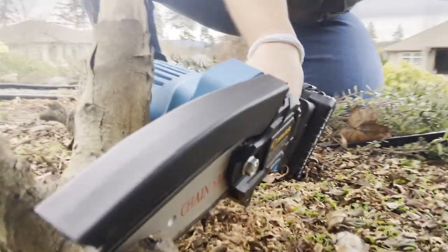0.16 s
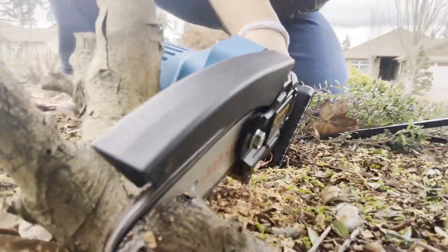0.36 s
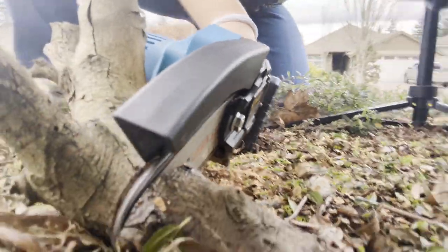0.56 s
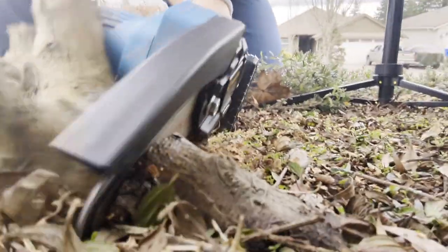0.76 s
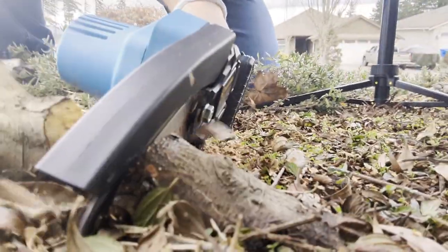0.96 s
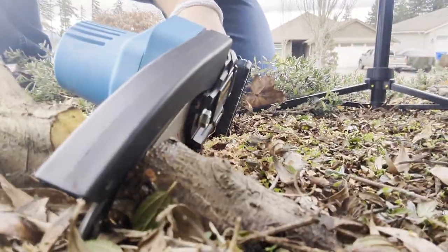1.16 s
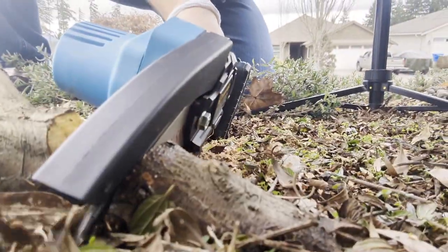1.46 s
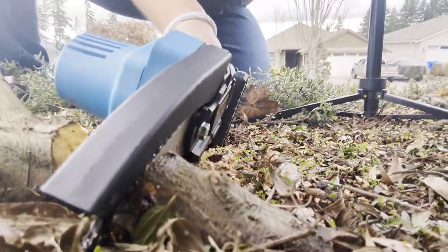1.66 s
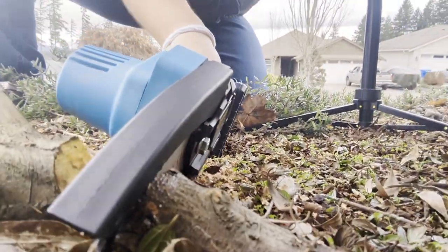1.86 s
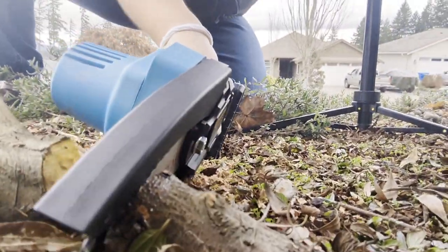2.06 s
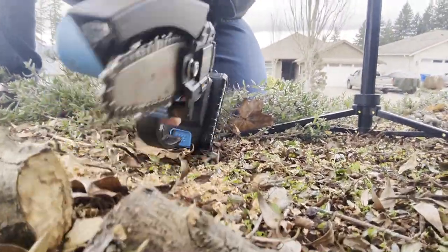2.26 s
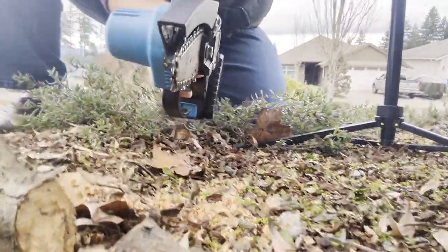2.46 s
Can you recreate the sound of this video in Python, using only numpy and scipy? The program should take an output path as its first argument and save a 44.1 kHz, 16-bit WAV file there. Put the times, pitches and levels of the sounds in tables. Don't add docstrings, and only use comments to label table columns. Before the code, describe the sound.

Close stereo sound of an electric chainsaw cutting wood outdoors: steady buzzing whine with hissing fan, a short juddering snag, free running, quick stop with a click, then sparse leaf rustles and twig snaps.

```python
import sys
import numpy as np
from scipy import signal
from scipy.fft import rfft, irfft, next_fast_len
from scipy.io import wavfile
from scipy.ndimage import map_coordinates

SR = 44100
rng = np.random.default_rng(int(sys.argv[2]) if len(sys.argv) > 2 else 0)


def wav_record(signal):
    frames = np.transpose(np.atleast_2d(signal))
    bounded = np.clip(frames, -1, 1)
    quanta = np.round(bounded * 32767).astype(np.int16)
    wavfile.write(sys.argv[1], SR, quanta)


def to_linear_factor(level_db):
    exponent = np.asarray(level_db, float) / 20
    return 10 ** exponent


N = 114660
PORT_LAG_S = 0.00011


def unit(x):
    return x / np.sqrt(np.mean(x ** 2) + 1e-20)


def along(points, hz):
    f, v = np.transpose(points)
    return np.interp(np.log(hz + 1), np.log(f + 1), v)


def curves(rows):
    s, *cols = np.transpose(rows)
    return [np.interp(np.arange(N) / SR, s, c) for c in cols]


def wobble(rate_hz):
    knots = rng.standard_normal(int(N * rate_hz / SR) + 4)
    return map_coordinates(knots, [np.arange(N) * rate_hz / SR])


def filtered(x, response):
    m = next_fast_len(N + SR // 2)
    return irfft(rfft(x, m) * response(np.fft.rfftfreq(m, 1 / SR)), m)[..., :N]


def mode(hz, centre_hz, width_hz):
    damping = 1j * hz * width_hz
    return damping / (centre_hz * centre_hz - hz * hz + damping)


def clatter(rate_hz, size_db, life_s, share):
    struck = rng.random(N) < rate_hz / SR
    hits = struck * to_linear_factor(size_db * np.clip(rng.standard_normal(N), -2, 2))
    gate = unit(signal.lfilter([1], [1, -np.exp(-1 / (life_s * SR))], hits))
    share = np.clip(share, 0, 1)
    return rng.standard_normal((2, N)) * np.sqrt(1 - share + share * gate ** 2)


# (frequency [Hz], correlation [-1 to 1])
PORT_LIKENESS = [(100, 0.93), (500, 0.65), (1200, 0.58), (2500, 0.12), (6000, 0.15)]


def ports(pair, left, right):
    def mix(hz):
        turn = np.arccos(np.clip(along(PORT_LIKENESS, hz), -1, 1)) / 2
        return np.array([np.cos(turn), np.sin(turn)])

    def colour(hz):
        lag = np.exp(-2j * np.pi * hz * PORT_LAG_S)
        return to_linear_factor([along(left, hz), along(right, hz)]) * [lag, 1 + 0 * hz]

    mid, side = filtered(pair, mix)
    return unit(filtered(np.array([mid + side, mid - side]), colour))


# (time [s], chain effort [dB], casing shake [dB], cutting load [0-1])
MOTOR = [(0, -34.5, -3.5, 0.6), (.2, -34.5, 0, 0.56), (.35, -33, 2, 0.68), (.64, -32.5, 0, 0.9),
         (.7, -32.5, -7, 0.8), (.835, -33.5, 7.5, 0.8), (.855, -36, 5.5, 0.2), (.92, -35, 7, 0.02),
         (1.05, -34, 2, 0), (1.3, -35, 0, 0.61), (1.52, -34, 0.5, 0.33), (1.57, -37.5, -4, 0),
         (1.62, -45, -12.5, 0.44), (1.655, -49, -29, 0), (1.672, -78, -40, 0.04), (1.69, -84.5, -60, 0.1)]
# (time [s], speed [Hz])
SHAFT_SPEED = [(0, 309), (.15, 312), (.66, 311.5), (.72, 290), (.84, 250), (.852, 256), (.87, 288),
               (.918, 314.5), (.98, 321.5), (1.522, 322), (1.562, 230), (1.596, 160), (1.62, 135),
               (1.69, 20)]


def saw():
    shaft_hz, = curves(SHAFT_SPEED)
    effort_db, shake_db, load = curves(MOTOR)
    turns = np.cumsum(shaft_hz) / SR
    tones = shaft_tones(shaft_hz, turns, shake_db, load)
    beat = chain_beat(turns, effort_db)
    noise = chain(shaft_hz) * to_linear_factor(0.92) + fan(shaft_hz) * to_linear_factor(6.0)
    return nearby(poses(beat * noise)) + tones * to_linear_factor([[-.7], [.7]])


SHAFT_ORDERS = [1, 1.8, 2, 2.55, 3, 4, 5]
# (running free [dB], under load [dB])
ORDER_LEVELS = [(-54, -62), (-56.5, -59.5), (-46.5, -48.5), (-66, -54.5), (-60, -41), (-65.5, -59),
                (-57.5, -56.5)]


def shaft_tones(shaft_hz, turns, shake_db, load):
    tones = 0
    for order, (free_db, cut_db) in zip(SHAFT_ORDERS, ORDER_LEVELS):
        level_db = free_db + (cut_db - free_db) * load + shake_db
        level_db = level_db + (.7 + order * load) * wobble(70)
        radiation = np.minimum(order * shaft_hz / 225, np.sqrt(2)) ** 3 / 2
        jitter = (.15 + .08 * order * order * load) * wobble(60)
        tones = tones + to_linear_factor(level_db) * radiation * np.sin(2 * np.pi * order * turns + jitter)
    return tones


GEAR_RATIO, LOOP_TURNS, HITS_PER_TURN = 5, 28, 9


def chain_beat(turns, effort_db):
    links = np.tile(rng.standard_normal(7), 40)
    loop_db = -0.36 * map_coordinates(links, [turns / LOOP_TURNS * 7])
    shaft = 1 + 0.16 * np.cos(2 * np.pi * turns)
    sprocket = 1 + 0.073 * np.cos(2 * np.pi * turns / GEAR_RATIO)
    return shaft * sprocket * to_linear_factor(effort_db + loop_db + .4 * wobble(12))


# (frequency [Hz], density [dB per Hz])
CHAIN_LEFT = [(200, -18.5), (450, -3), (850, -1.5), (1100, 1.5), (2200, -1), (4500, -2.5), (6200, -9.5),
              (8300, -0.5)]
CHAIN_RIGHT = [(200, -25.5), (450, -4.5), (850, -3.5), (1700, 3), (2400, 1.5), (5000, 2), (6450, 1),
               (7300, 2.5)]


def chain(shaft_hz):
    rattle = clatter(2 * shaft_hz * HITS_PER_TURN / GEAR_RATIO, 10, 0.00071, 0.21)
    top = [(9170, -25)]  # Hz, dB per Hz
    return ports(rattle, CHAIN_LEFT + top, CHAIN_RIGHT + top)


# (frequency [Hz], density [dB per Hz])
FAN_LEFT = [(7000, -32), (8300, -9.5), (10000, 1), (12000, -0.5), (14500, -5), (15900, -16)]
FAN_RIGHT = [(7000, -7), (8400, 4), (10000, 1.5), (11800, 10), (14000, 11.5), (15900, 6.5)]


def fan(shaft_hz):
    hiss = ports(clatter(shaft_hz * 2.0, 9.5, 0.0013, 0.14), FAN_LEFT, FAN_RIGHT)
    fade_db_per_s = -5
    return hiss * to_linear_factor(4 + fade_db_per_s * np.minimum(np.arange(N) / SR, .8))


# (frequency [Hz], width [Hz], boost [dB])
POSE_MODES = [
    [(1690, 340, -2), (3640, 270, -1.5), (6500, 450, -9), (8620, 570, -1.5)],
    [(1550, 250, -2.5), (3384, 400, -0.5), (4110, 250, -7.5), (6530, 170, 2), (8270, 370, -16.5)],
    [(1695, 88, 0), (1976, 130, -1.5), (2620, 280, -7), (5430, 110, -10.5), (6355, 200, 2), (8180, 600, -7)],
]
# (time [s], pose [0-2])
POSE = [
    (0, 0),
    (.22, 0.1),
    (.34, 1),
    (.7, 1),
    (.86, 2),
    (2.6, 2),
]


def poses(x):
    pose, = curves(POSE)
    out = 0
    for k, modes in enumerate(POSE_MODES):
        def ring(hz):
            return 1 + sum(to_linear_factor(db) * mode(hz, centre, width) for centre, width, db in modes)
        out = out + filtered(x, ring) * np.maximum(1 - abs(pose - k), 0)
    return out


# (frequency [Hz], width [Hz], depth [0-1])
GUARD_SHADOWS = [(4054, 54, 0.6), (7300, 310, 0.54), (10070, 590, 0.4)]


def nearby(x):
    when = rng.random((2, 2, 6, 1))
    size = rng.standard_normal((2, 2, 6, 1))
    spread_s, strength_db = .004, -14

    def path(hz):
        copies = size * np.exp(-2j * np.pi * hz * when * spread_s)
        echoes = 1 + to_linear_factor(strength_db) * np.sum(copies, axis=2) / 2
        shadow = 1
        for centre, width, depth in GUARD_SHADOWS:
            shadow = shadow * (1 - np.clip(depth, 0, .95) / (1 + (2 * (hz - centre) / width) ** 2))
        small_source = hz ** 2 / (hz ** 2 + 127.0 ** 2)
        return echoes * shadow * small_source

    here, there = filtered(x, path)
    rock = .5 + .5 * np.tanh(2 * wobble(4))
    return here * rock + there * (1 - rock)


# (frequency [Hz], width [Hz], level [dB])
LOG_MODES = [(134, 37, -2), (235.4, 74, 0), (323, 77, 2), (462, 81, 1.5), (660, 200, -6.5), (987, 125, 1.5),
             (1430, 1100, -23.5)]


def wood(hz):
    return sum((-1) ** k * to_linear_factor(db) * mode(hz, centre, width)
               for k, (centre, width, db) in enumerate(LOG_MODES))


def log():
    body = filtered(blows(), wood) + shudder() + thumps()
    return np.array([to_linear_factor(-3.5) * np.roll(body, round(PORT_LAG_S * SR)), to_linear_factor(2.0) * body])


# (time [s], peak [dB])
SNAGS = [(0.686, -18), (0.698, -20), (0.72, -20), (0.731, -19), (0.739, -26), (.755, -28.5), (0.762, -20.5),
         (0.779, -16), (0.784, -14), (0.7943, -12), (0.799, -13), (0.809, -21), (0.815, -19), (0.83, -15),
         (0.835, -28.5), (0.838, -14.5)]
# (time [s], peak [dB])
NUDGES = [
    (0.438, -36),
    (0.448, -38),
    (2.234, -40.5),
]


def blows():
    force = np.zeros(N)
    for s, db in SNAGS + NUDGES:
        rough = 1 + .6 * rng.standard_normal(40)
        force[round(s * SR):][:40] = to_linear_factor(db + 4) * rough * np.hanning(40) * rng.choice([-1, 1])
    return force


# (time [s], shudder [dB], groan pitch [Hz], groan [dB])
SHUDDER = [
    (.674, -66, 162, -46),
    (.69, -37.5, 164, -40),
    (.714, -35.5, 172.2, -38),
    (.738, -33, 302, -27),
    (.766, -36.5, 232, -32),
    (.796, -23.5, 236, -31),
    (.818, -33, 208, -37.5),
    (.84, -35.5, 430, -27),
    (.847, -46, 427, -52),
]


def shudder():
    t = np.arange(N) / SR
    shudder_db, groan_hz, groan_db = curves(SHUDDER)
    caught = (t > SHUDDER[0][0]) & (t < SHUDDER[-1][0])
    groan_gain = to_linear_factor(groan_db + 1.5 + 3.0 * wobble(70))
    groan = groan_gain * np.sin(2 * np.pi * np.cumsum(groan_hz) / SR + 0.54 * wobble(60))
    shake = unit(filtered(rng.standard_normal(N), wood)) * to_linear_factor(shudder_db + 2.35 * wobble(60.28))
    return caught * (shake + groan)


# (time [s], level [dB])
SOIL_THUMPS = [
    (0.799, -25),
    (0.85, -28),
    (2.241, -48),
    (2.359, -44),
    (2.366, -49),
    (2.575, -55),
]


def thumps():
    t, out = np.arange(N) / SR, np.zeros(N)
    soil_hz, t60_s, rise_s = 105.5, 0.059, 0.0042
    for s, db in SOIL_THUMPS:
        u = np.maximum(t - s, 0)
        decay = to_linear_factor(db - 60 * u / t60_s)
        out = out + decay * np.sin(2 * np.pi * soil_hz * u) * (1 - np.exp(-u / rise_s))
    return out


# (time [s], peak [dB], pitch [Hz], left
# over right [dB])
SNAPS = [(1.7384, -58, 5260, -14), (1.8152, -53, 13300, -16), (1.8286, -59, 5160, -14),
         (1.89, -51, 2120, 5), (2.034, -48, 6500, 11), (2.0584, -51.5, 5230, -21), (2.0894, -48, 2140, -7),
         (2.1128, -46, 2600, -15), (2.184, -47.5, 1720, -15), (2.28, -52.5, 2170, -18),
         (2.3237, -50.5, 2230, -12.5), (2.33, -48, 2300, -20), (2.339, -49, 2470, -17),
         (2.565, -57.5, 2010, -7),
         (1.655, -34, 950, -4),
    (1.654, -33, 2610, -6),
    (1.862, -49, 900, 2),
    (1.891, -50, 870, 5),
    (2.2144, -59, 2900, -3),
    (2.236, -38, 5660, 13),
    (2.2358, -41.5, 2300, 6),
         (1.7587, -57.5, 5500, -11), (1.771, -53, 2310, -7), (1.8, -52, 800, 5), (1.835, -57, 1000, -2),
         (1.8725, -61, 900, -3), (1.881, -55.5, 3500, -5), (1.906, -60, 6000, -3), (1.913, -55.5, 900, -5),
         (1.9872, -63.5, 8970, -5), (2.13, -56, 2200, -12), (2.1518, -54, 2240, -11),
         (2.1752, -57, 2100, -18), (2.2032, -55, 1930, -8), (2.219, -48, 9000, -4), (2.238, -38, 600, 5),
         (2.4346, -63.5, 12100, -4), (2.444, -57, 6300, -1)]


def snaps():
    out, t = np.zeros((2, N + SR)), np.arange(SR // 40) / SR
    f = np.fft.rfftfreq(len(t), 1 / SR)
    for s, db, hz, pan_db in SNAPS:
        t60_s = 0.0045 + 9 / hz
        first_break = 4.3 * (t == 0)
        burst = to_linear_factor(-60 * t / t60_s) * (rng.standard_normal((2, len(t))) + first_break)
        response = mode(f, hz, 0.77 * hz) ** 2 + to_linear_factor(-18)
        snap = irfft(rfft(burst) * response, len(t))
        gain = to_linear_factor(db + 3.0 + np.array([[pan_db], [-pan_db]]) / 2)
        out[:, round(s * SR):][:, :len(t)] += gain * snap / abs(snap).max()
    return out[:, :N]


# (time [s], crackle [dB], fine sifting [dB])
RUSTLE = [(1.6, -93, -101.5), (1.69, -78, -82), (1.78, -71.5, -69), (1.9, -72.5, -74), (1.92, -79, -89),
          (2.04, -81, -97), (2.08, -64.5, -70), (2.12, -63, -78), (2.15, -68.5, -75), (2.19, -62, -74),
          (2.22, -59.5, -63), (2.28, -79.5, -68), (2.34, -60, -61), (2.36, -83, -80), (2.6, -76.5, -91.5)]
# (frequency [Hz], density [dB per Hz])
LEAF_COLOUR = [(300, -25.5), (700, 0), (1000, -1.5), (2100, 3), (3800, -2), (5000, -9.5), (8000, -19.5),
               (16000, -33)]
# (frequency [Hz], density [dB per Hz])
SIFT_COLOUR = [(3000, -31.5), (6000, -1), (9000, -7), (10500, -14), (13500, 2), (16000, -3)]


def rustle():
    crackle_db, sift_db = curves(RUSTLE)
    crackle = clatter(360 * to_linear_factor(2.8 * wobble(30)), 3.3, 0.0007, 0.61)
    bed = ports(crackle, LEAF_COLOUR, [(f, db + 7.5) for f, db in LEAF_COLOUR])
    sift = clatter(250 * to_linear_factor(3.2 * wobble(25)), 4, .0007, 0.63)
    dust = ports(sift, SIFT_COLOUR, [(f, db + 9.5) for f, db in SIFT_COLOUR])
    return bed * to_linear_factor(crackle_db + 2.0 + 1.2 * wobble(36)) + dust * to_linear_factor(sift_db - 1.5)


# (time [s], level [dB])
SCUFF = [
    (1.6, -95),
    (1.76, -82),
    (1.8, -73),
    (1.9, -74),
    (1.94, -92),
    (2.46, -89),
    (2.51, -65.5),
    (2.55, -71),
    (2.6, -69.5),
]
# (frequency [Hz], density [dB per Hz])
SOIL_COLOUR = [(200, -24.5), (450, -1.5), (950, -1.5), (1400, -21), (3000, -51)]


def scuff():
    level_db, = curves(SCUFF)
    grains = clatter(150 * to_linear_factor(5.3 * wobble(30)), 4, .003, .6)
    return ports(grains, SOIL_COLOUR, SOIL_COLOUR) * to_linear_factor(level_db)


# (frequency [Hz], density [dB per Hz])
TOWN_COLOUR = [(20, -39.5), (55, -2.5), (140, 0.5), (230, -7), (500, -13), (1100, -17), (4000, -40.5),
               (16000, -56)]


def town():
    return ports(rng.standard_normal((2, N)), TOWN_COLOUR, TOWN_COLOUR) * to_linear_factor(-67 + .8 * wobble(8))


def scene():
    return saw() + log() + snaps() + rustle() + scuff() + town()


def roll_off(x):
    return signal.sosfilt(signal.butter(12, 16770, fs=SR, output="sos"), x)


def record(dry):
    def band(hz):
        return 1 / (1 + (hz / 15800) ** 160)
    return roll_off(filtered(dry, band))


dry = scene()
out = record(dry)
wav_record(out)
```